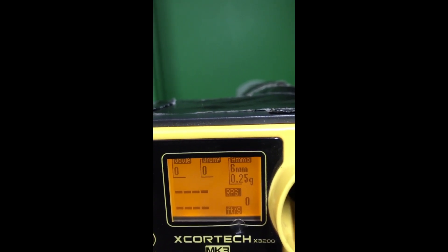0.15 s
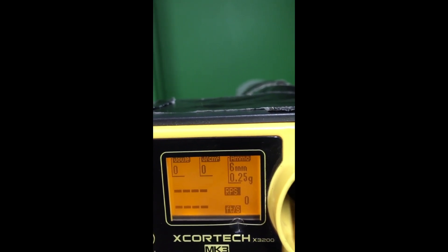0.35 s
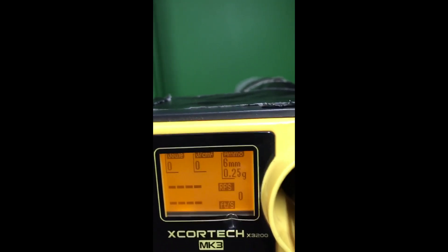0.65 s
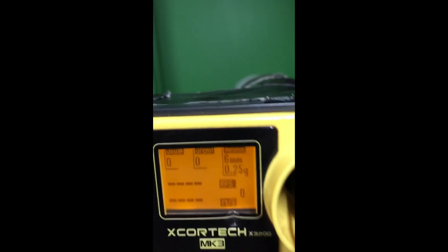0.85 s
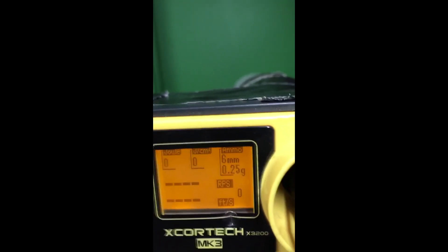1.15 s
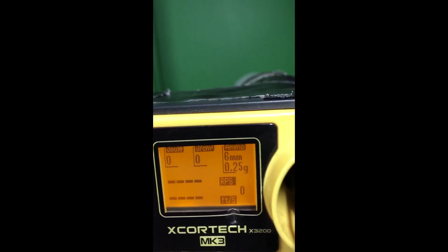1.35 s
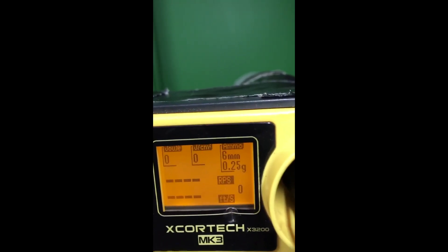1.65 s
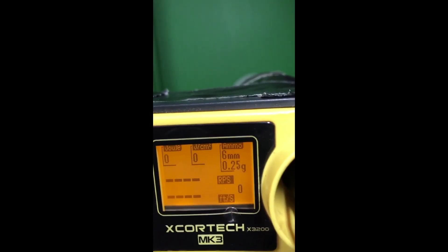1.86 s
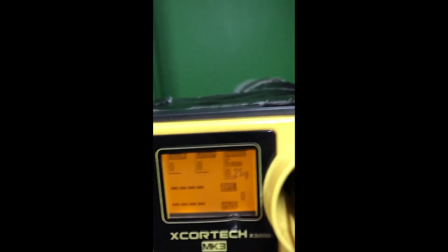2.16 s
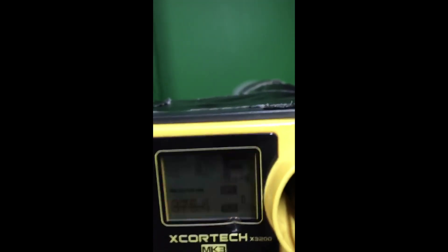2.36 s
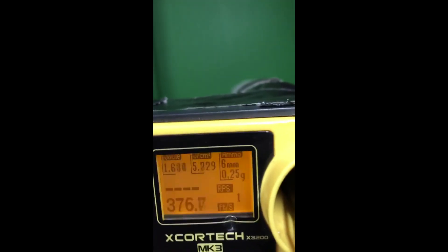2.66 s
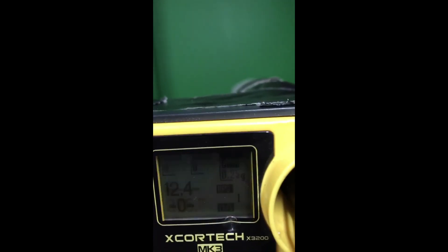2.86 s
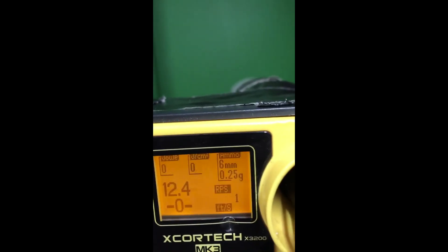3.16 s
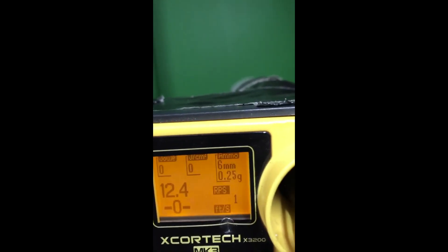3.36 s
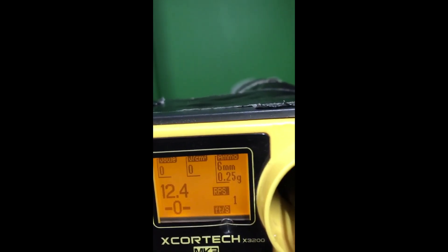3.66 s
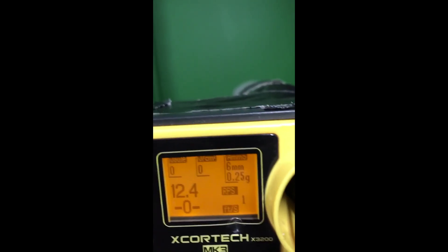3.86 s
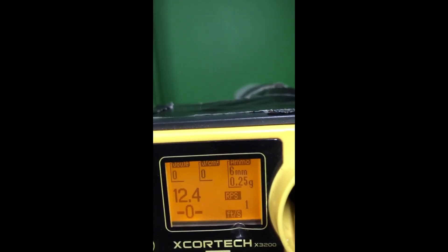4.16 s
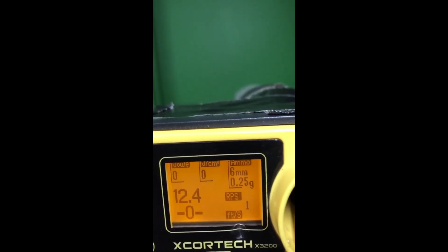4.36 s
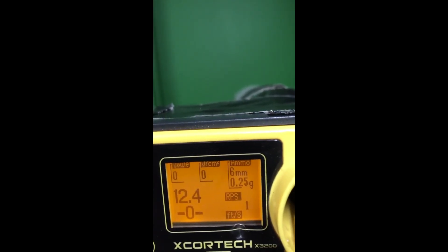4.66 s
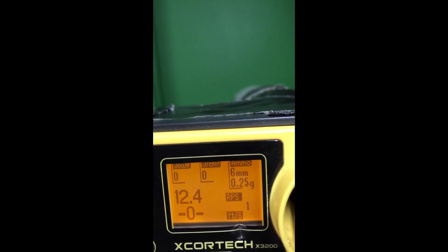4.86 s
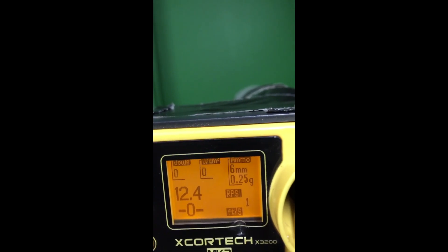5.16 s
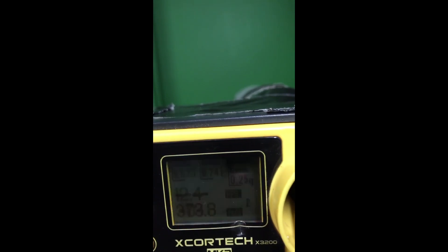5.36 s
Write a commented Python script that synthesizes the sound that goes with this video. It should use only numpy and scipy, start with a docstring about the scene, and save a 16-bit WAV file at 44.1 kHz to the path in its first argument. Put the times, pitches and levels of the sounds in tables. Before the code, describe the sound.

A close electric airsoft rifle rattles off a short, loud, distorted full-auto burst, with whining gears, hard piston slaps and a thin spring ring. Pellets bounce lightly around the small room while the ventilation hum dips and creeps back. After a few handling clicks, the gun whirs and snaps once more, followed by a couple of small knocks and pellet ticks.

```python
"""A whirring, clacking eight-round burst, then one shot: an electric airsoft rifle close by in a small room.
Each cycle the geared motor draws the spring, the piston snaps free and slams home, and the pellet thumps
into a trap. Spent pellets bounce about; the gun clicks in the hand. The shots overload the recorder,
whose gain control ducks the ventilation rumble and lets it creep back."""
import sys
import numpy as np
from scipy import signal
from scipy.fft import rfft, irfft, next_fast_len
from scipy.io import wavfile
from scipy.ndimage import uniform_filter1d

SR = 44100
rng = np.random.default_rng(int(sys.argv[2]) if len(sys.argv) > 2 else 0)


def dump_mix(stems):
    """Bounce the given channels to the path in sys.argv[1] as a 16-bit WAV at rate SR."""
    frames = np.atleast_2d(stems).T  # one column per channel
    limited = np.clip(frames, -1, 1)  # hard clip at full scale
    pcm = np.round(limited * 32767).astype(np.int16)
    wavfile.write(sys.argv[1], SR, pcm)


N = 243431
TIME = np.arange(N) / SR

# firing cycles: release t/s, strength/dB, trap delay/s, air puff/dB
SHOTS = [(2.043, 7.5, 0.033, 12), (2.119, 13, 0.023, 0.5), (2.1913, 14, 0.023, 13), (2.265, 15, .019, -1.5),
         (2.338, 15.5, .018, 1), (2.4112, 16.5, .013, 4.5), (2.484, 15.5, .0195, 1.5),
         (2.557, 15, 0.018, 1.5), (5.049, 1, 0.022, 6.5)]
# gear noise spectrum: f/Hz, density/dB
GEAR_SPECTRUM = [(40, -22.5), (400, -10.5), (1000, -11.5), (2300, -3), (3200, -0.5), (4200, -6.5),
                 (5500, -11), (7200, -8.5), (8800, -7), (12000, -24)]
# plastic click spectrum: f/Hz, density/dB
CLICK_SPECTRUM = [(200, -13), (1000, -2), (2200, 0.5), (3100, 4.5), (4500, -3), (5800, 1.5), (7000, -1.5),
                  (8800, 1), (12000, -15.5)]


def shots(release_db=-1.2, recoil_db=-9, slam_db=0.63, trap_db=-2.5):
    """The piston snaps free, jolts the gun and slams into the cylinder head; the pellet hits the trap."""
    # piston release and slam spectra: f/Hz, density/dB
    release = [(60, -5.5), (150, -1), (400, -2), (1200, -8.5), (2200, -7.5), (3200, 2), (4200, -10),
               (5500, -18), (8800, -8.5), (12000, -19.5)]
    slam = [(30, -7), (70, 4.5), (180, 4.5), (400, -2), (600, 2.5), (800, -0.5), (1500, -2), (2300, -5),
            (3200, -4.5), (5000, -8), (7000, -8.5), (9000, -10), (12000, -15)]
    # gearbox knocks: t/s, level/dB
    knocks = [(1.9884, 4.5), (2.219, 7.5), (2.441, 12.5), (5.076, -9)]
    out = np.zeros(N)
    for s, db, delay_s, _ in SHOTS:
        add(out, s, amp(db + release_db) * strike(release, rise_s=.0016, hold_s=.0038, decay_s=.0044))
        add(out, s + .003, amp(db + recoil_db) * mode(hz=140, rise_s=.002, decay_s=.006))
        add(out, s + .0088, amp(db + slam_db) * strike(slam, rise_s=.0012, hold_s=.0092, decay_s=.0048))
        add(out, s + delay_s - .004, amp(db + trap_db) * trap_thump())  # peaks near the delay
    for s, db in knocks:
        add(out, s, amp(db) * strike(GEAR_SPECTRUM, rise_s=.00083, hold_s=.0014, decay_s=.0015))
    return out


def trap_thump(start_hz=680, slide_s=.0083, rise_s=.0031, decay_s=.004):
    """A padded target gives way: its pitch slides down as it dies."""
    t = TIME[:4096]
    cycles = start_hz * slide_s * (1 - np.exp(-t / slide_s))
    envelope = np.minimum(t / rise_s, 1) * np.exp(-np.maximum(t - rise_s, 0) / decay_s)
    return np.sin(2 * np.pi * cycles) * envelope


def motor(coast_s=.058, sag=.1, waver=.012):
    """Gear teeth whine and rattle; the motor spins up, sags as the spring tightens, and coasts down."""
    # trigger pulls: on/s, off/s, unloaded mesh f/Hz, spin-up/s, swell/s, rattle/dB, whine/dB
    pulls = [(1.946, 2.589, 2677, .013, .24, -14, -15.5), (4.992, 5.089, 3890, 0.022, .09, -21.5, -29)]
    # growl of the labouring motor in the stock: f/Hz, density/dB
    growl_spectrum = [(100, -29.5), (450, -12), (620, -3), (780, -10), (980, 1), (1300, -10), (2000, -13),
                      (6000, -37.5)]
    out = np.zeros(N)
    for on_s, off_s, unloaded_hz, spin_up_s, swell_s, rattle_db, whine_db in pulls:
        t = TIME[:round((off_s - on_s + 6 * coast_s) * SR)]
        coast = np.exp(-np.maximum(on_s + t - off_s, 0) / coast_s)
        speed = (1 - np.exp(-t / spin_up_s)) * coast
        mesh_hz = unloaded_hz * speed * (1 - .09 * strain(t, length_s=.14))
        load = sum(np.exp(-abs(s - on_s - t) / .03) * (on_s + t < s) for s, *_ in SHOTS)
        wobble = unit_rms(uniform_filter1d(rng.standard_normal(len(t)), size=90))
        phase = 2 * np.pi * np.cumsum(mesh_hz * (1 - sag * load) * (1 + waver * wobble)) / SR
        slower_gears = amp(-15) * np.sin(phase / 2) + amp(-17) * np.sin(phase / 3)
        whine = np.sin(phase) + amp(-16) * np.sin(2 * phase) + slower_gears
        whine *= amp(-130 * (1 - speed))  # sings only near full speed
        whine *= amp(whine_db + 27 * strain(t, length_s=.125))
        growl_db = -10 - 6 * np.log2(np.maximum(mesh_hz, 600) / 2600)  # louder when slow
        growl = amp(growl_db) * noise(growl_spectrum, len(t))
        rub = 1 + .42 * np.cos(phase / 10)  # ten-tooth pinion, once a turn
        rattle = rub * (noise(GEAR_SPECTRUM, len(t)) + growl)
        rattle *= amp(rattle_db + 17.6 * strain(t, length_s=.19))
        envelope = (1 - np.exp(-t / swell_s)) * coast ** 2
        add(out, on_s, envelope * (whine + rattle))
    return out


def strain(t, length_s):
    """Gear strain on starting from rest: holds near one, then eases off."""
    return 1 / (1 + (t / length_s) ** 4)


def metal_ring(x, coil_db=-6, coil_t60_s=.22, shiver_db=-21, shiver_t60_s=1.1, count=60):
    """Blows and rattle ring the gearbox shell and the spring's crowded modes; a faint shiver lingers."""
    # spring and shell modes: f/Hz, level/dB, t60/s
    main_modes = [(974, -6, 0.12), (2266, 1.5, 0.11), (2555, -2, 0.092), (3075, -22, 1.2), (3177, -26, 1.4),
                  (6246, -3.5, 0.32), (6840, 4, 0.25), (7060, -2.5, .2), (8580, 0.5, 0.099)]
    t = TIME[:SR]
    coil_hz = 3800 + 5500 * (np.arange(count) + rng.random(count)) / count
    modes = list(main_modes) + [(hz, coil_db, coil_t60_s) for hz in coil_hz]
    ring = sum(amp(db - 60 * t / t60_s) * np.sin(2 * np.pi * (hz * t + rng.random()))
               for hz, db, t60_s in modes)
    shiver = noise(GEAR_SPECTRUM, len(t), tilt_db_oct=4) * amp(-60 * t / shiver_t60_s)
    response = ring / np.linalg.norm(ring) + amp(shiver_db) * shiver / np.linalg.norm(shiver)
    return signal.oaconvolve(x, response)[:N]


def muzzle_puffs():
    """Air from the muzzle pushes the microphone's diaphragm slowly to and fro."""
    out = np.zeros(N)
    for s, *_, db in SHOTS:
        add(out, s + .023, 1.5 * amp(db) * mode(hz=53.77, rise_s=.0058, decay_s=.01))
    return out


def handling(ping_db=-27, latch_db=.5):
    """Plastic clicks in the hand, each with a thin ping and a latch tick; pitched knocks of the stock."""
    # clicks: t/s, level/dB, tilt/(dB/octave)
    clicks = [(.059, -47, -4.5), (0.415, -43, -8.5), (.725, -38.5, -9), (0.7564, -28.5, -4),
              (.873, -36.5, -3.5), (.885, -29.5, 4.5), (1.142, -40, -1), (3.735, -44, 2),
              (3.833, -43.5, .5), (3.852, -35.5, -6.5), (3.864, -26, 5.5)]
    # knocks of stock and fittings: t/s, level/dB, f/Hz
    knocks = [(.7563, -20, 643), (.761, -27, 255), (.873, -34, 3300), (2.72, -19, 146.5),
              (3.864, -30, 1395), (5.159, -16.5, 734), (5.178, -18.5, 850)]
    out = np.zeros(N)
    for s, db, tilt in clicks:
        click = strike(CLICK_SPECTRUM, rise_s=.00032, hold_s=.0003, decay_s=.0026, tilt_db_oct=tilt)
        add(out, s, amp(db) * click)
        add(out, s, amp(db + ping_db + tilt / 2) * mode(hz=5670, rise_s=.0011, decay_s=.052))
        add(out, s, amp(db + latch_db - .83 * tilt) * mode(hz=2920, rise_s=.00031, decay_s=.00074))
    for s, db, hz in knocks:
        add(out, s, amp(db) * mode(hz=hz, rise_s=.00031, decay_s=.0024))
    return out


def pellet_bounces(wet_db=-5, skitter_count=9):
    """Pellets tick on hard things across the room and skitter to rest; some give a short, dry ping."""
    # ticking and pinging bounces: t/s, level/dB
    tick_hits = [(2.847, -33), (2.9355, -38), (2.9858, -27.5), (3.0686, -33), (3.1228, -39.5),
                 (3.2242, -38.5), (5.407, -38.5)]
    ping_hits = [(2.877, -23), (2.993, -25), (3.075, -29), (3.372, -37), (5.51, -35)]
    # skitter: start/s, end/s, first level/dB, last level/dB
    skitter = (3, 3.5, -35, -56)
    start_s, end_s, first_db, last_db = skitter
    progress = (np.arange(skitter_count) + rng.random(skitter_count)) / skitter_count
    skitter_hits = [(start_s + u * (end_s - start_s), first_db + u * (last_db - first_db))
                    for u in progress]
    ticks, pings = np.zeros(N), np.zeros(N)
    for s, db in list(tick_hits) + skitter_hits:
        tick = strike(CLICK_SPECTRUM, rise_s=.00058, hold_s=.0066, decay_s=.0087, tilt_db_oct=2)
        add(ticks, s, amp(db) * tick)
    for s, db in ping_hits:
        add(pings, s, amp(db) * mode(hz=4440, rise_s=.0058, decay_s=.01))
    return ticks + pings + amp(wet_db) * room(ticks)


def room(x):
    """Dense reflections, each band dying at its own rate."""
    # reflection spectrum: f/Hz, level/dB
    spectrum = [(40, -15), (200, -8), (700, -3.5), (1500, 0), (3000, 4), (4500, 2), (7000, 9), (9000, 4.5)]
    # decay: f/Hz, t60/s
    t60 = [(100, .28), (700, 0.5), (2000, 0.36), (5000, 0.29), (9000, .27)]
    onset = np.clip((TIME[:SR // 2] - .004) / .008, 0, 1)
    hz, t, bands = signal.stft(onset * rng.standard_normal(len(onset)), SR, nperseg=256)
    bands *= amp(log_interp(spectrum, hz)[:, None] - 60 * t / log_interp(t60, hz)[:, None])
    tail = signal.istft(bands, SR, nperseg=256)[1]
    return signal.oaconvolve(x, tail / np.linalg.norm(tail))[:N]


def ventilation(rumble_db=-41.5, swell_db=.8, waver_rad=.44):
    """Rumble and hum; one slow drift sways the rumble's level and the hum's phase."""
    # rumble spectrum: f/Hz, density/dB
    rumble = [(12, -29), (20, -14), (33, -9), (50, 2.5), (75, -9.5), (141, -7), (164, -15.5), (359, -18.5),
              (419, -25), (891, -26), (1070, -23.5), (2050, -36), (2460, -36), (8560, -56.5), (10000, -81),
              (13000, -112), (22000, -120)]
    # hum tones: f/Hz, level/dB
    tones = [(49.5, -47), (136, -49.5)]
    drift = unit_rms(low_pass(noise([(1, 0), (4, -6), (12, -60), (40, -120)], N), hz=100))
    hum = sum(amp(db) * np.sin(2 * np.pi * hz * TIME + waver_rad * drift) for hz, db in tones)
    return amp(rumble_db + swell_db * drift) * noise(rumble, N) + hum


def strike(spectrum, rise_s, hold_s, decay_s, tilt_db_oct=0):
    """A blow into densely packed modes: swells, chatters briefly, dies."""
    t = TIME[:4096]
    envelope = np.minimum(t / rise_s, 1) * np.exp(-np.maximum(t - rise_s - hold_s, 0) / decay_s)
    return noise(spectrum, len(t), tilt_db_oct) * envelope


def mode(hz, rise_s, decay_s):
    """One damped mode with a soft start."""
    t = TIME[:SR // 2]
    return np.sin(2 * np.pi * hz * t) * np.minimum(t / rise_s, 1) * np.exp(-t / decay_s)


def noise(spectrum, size, tilt_db_oct=0):
    """Unit-rms shaped noise; the tilt pivots at 4 kHz."""
    length = next_fast_len(size)
    hz = np.fft.rfftfreq(length, 1 / SR)
    octaves = np.log2(np.maximum(hz, 500) / 4000)
    gain = amp(log_interp(spectrum, hz) + tilt_db_oct * octaves)
    return unit_rms(irfft(rfft(rng.standard_normal(length)) * gain, length)[:size])


def log_interp(points, hz):
    point_hz, value = np.transpose(points)
    return np.interp(np.log(hz + 1), np.log(point_hz + 1), value)


def low_pass(x, hz):
    return signal.oaconvolve(x, signal.firwin(301, hz, window=("kaiser", 8), fs=SR), "same")


def amp(db):
    return 10 ** (np.asarray(db) / 20)


def unit_rms(x):
    return x / np.sqrt(np.mean(x ** 2) + 1e-20)


def add(mix, start_s, sound):
    part = mix[round(start_s * SR):][:len(sound)]
    part += sound[:len(part)]


def scene():
    """Rifle, pellets and ventilation in the room; mono."""
    gun, hand = shots() + motor(), handling()
    ring = metal_ring(amp(-19) * gun)
    wet = room(amp(-18.5) * gun + amp(-7) * hand)
    return (gun + hand + ring + muzzle_puffs() + wet + pellet_bounces() + ventilation())[None]


def gain_control(x, limit_db=-14, attack_s=.099, max_cut_db=21, hold_s=.32, recover_db_per_s=40, hop=64):
    """Gain falls, fast at first, while the level is over the limit; holds; creeps back."""
    level_db = 10 * np.log10(abs(uniform_filter1d(x ** 2, size=256)[::hop]) + 1e-12)
    step_s = hop / SR
    cut_db, quiet_s, cuts_db = 0, 0, []
    for db in level_db:
        quiet_s += step_s
        if db > limit_db:
            cut_db += (max_cut_db - cut_db) * step_s / attack_s
            quiet_s = 0
        if quiet_s > hold_s:
            cut_db = max(cut_db - recover_db_per_s * step_s, 0)
        cuts_db.append(cut_db)
    return x * amp(-np.interp(TIME, TIME[::hop], cuts_db))


def record(dry):
    """Narrow-band microphone, gain control, hard overload, band limit."""
    mic = low_pass(dry[0], hz=9250)
    overloaded = np.clip(gain_control(mic), -1, 1)
    return low_pass(overloaded, hz=16200)[None]


dry = scene()
out = record(dry)
dump_mix(out)
```